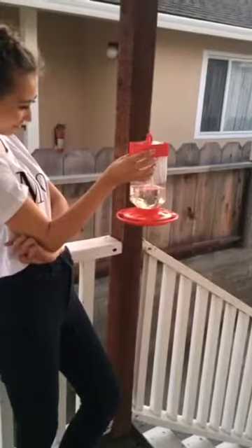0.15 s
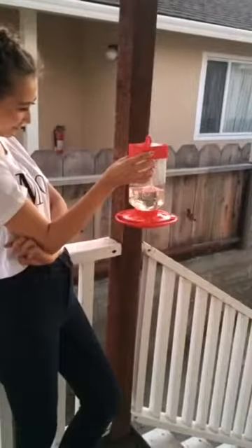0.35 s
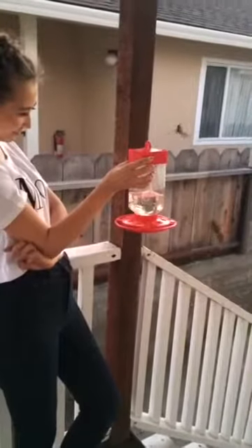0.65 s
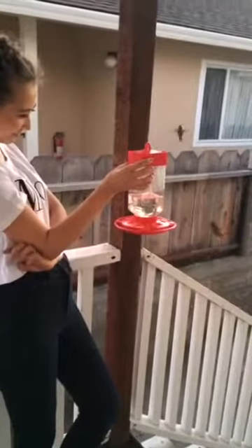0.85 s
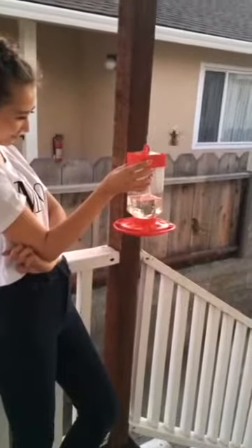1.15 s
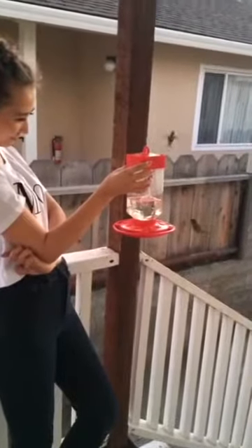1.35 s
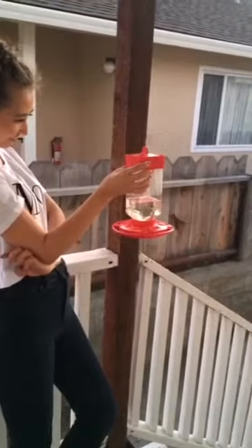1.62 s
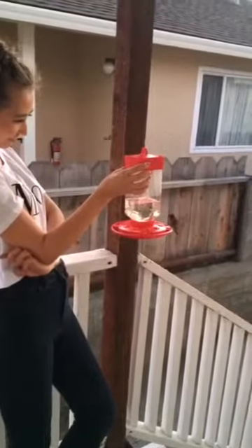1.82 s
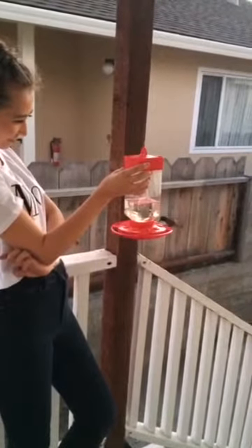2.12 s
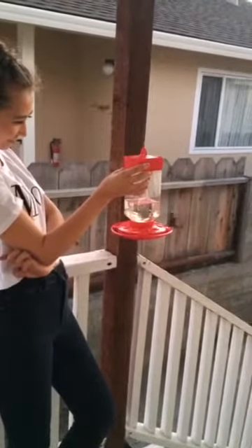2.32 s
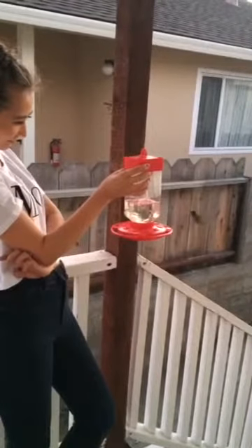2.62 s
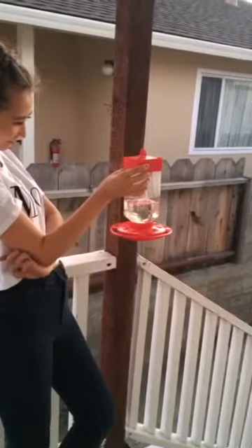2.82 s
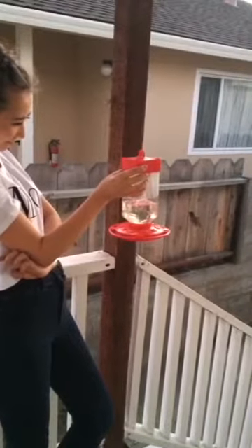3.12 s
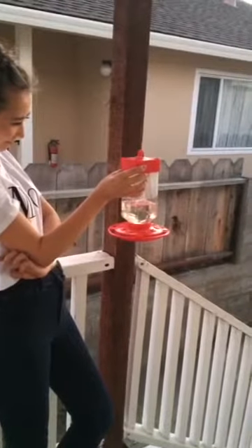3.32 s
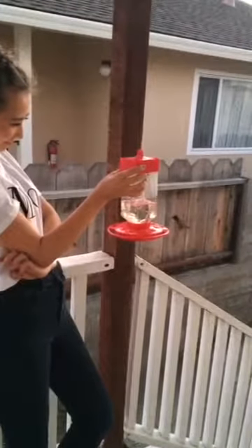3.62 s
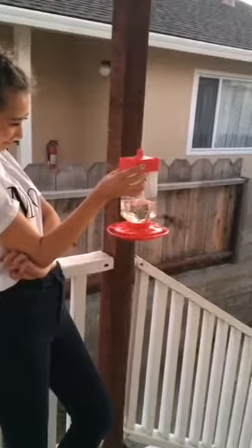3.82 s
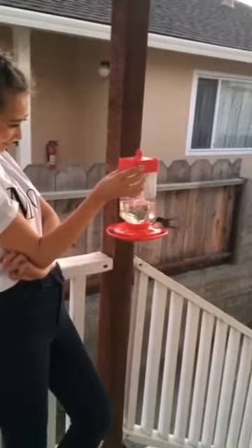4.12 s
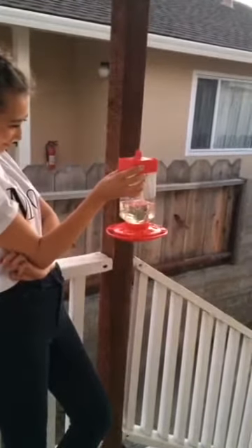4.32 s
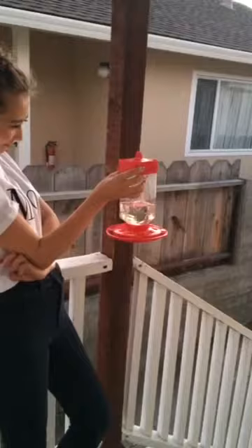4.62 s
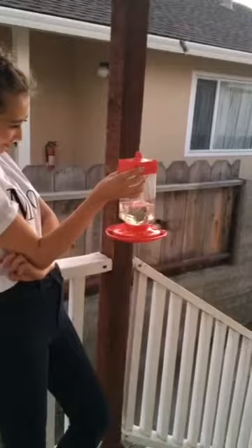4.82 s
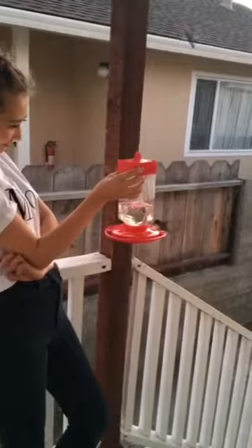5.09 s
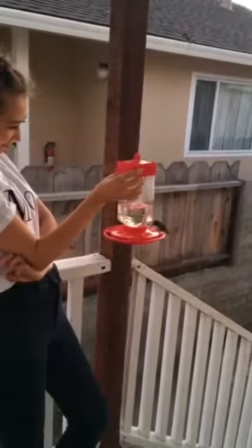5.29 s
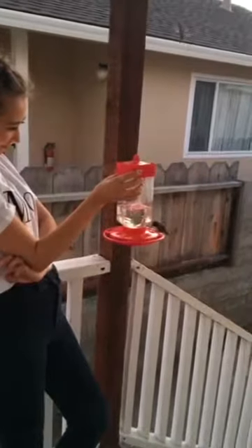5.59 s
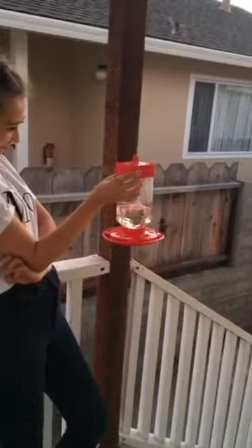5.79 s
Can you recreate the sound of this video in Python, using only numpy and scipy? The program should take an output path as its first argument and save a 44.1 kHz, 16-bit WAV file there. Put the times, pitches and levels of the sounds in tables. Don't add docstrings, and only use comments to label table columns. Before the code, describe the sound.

Piercing short bird chips scatter across a quiet porch, with soft fluttering wing buzz, light feeder taps, distant traffic rumble and thin airy hiss.

```python
import sys
import numpy as np
from scipy import signal
from scipy.fft import rfft, irfft, next_fast_len
from scipy.io import wavfile
from scipy.ndimage import uniform_filter1d, minimum_filter1d, map_coordinates

SR = 44100
rng = np.random.default_rng(int(sys.argv[2]) if len(sys.argv) > 2 else 0)


def digitize_waveform(pressure):
    field = np.atleast_2d(pressure).T
    bounded = np.clip(field, -1, 1)
    quanta = np.round(bounded * 32767).astype(np.int16)
    wavfile.write(sys.argv[1], SR, quanta)


def field_ratio(decibels):
    return 10 ** (np.asarray(decibels, dtype=float) / 20)


N = 262395

# (frequency [Hz], density [dB per Hz])
RUMBLE_SPECTRUM = [(12, -54), (20, -25.5), (102, 2), (177, -3), (209, -7.5), (264, -19), (330, -20.5),
                   (430, -37.5), (730, -120)]
DRONE_SPECTRUM = [(130, -43.5), (220, 0.5), (269, -13.5), (356, -4.5), (504, -9), (592, -9.5), (753, -11),
                  (947, -11.5), (1120, -17), (1370, -16), (1610, -25), (1830, -24.5), (2400, -29),
                  (3120, -88), (5280, -120)]
HISS_SPECTRUM = [(1060, -32.5), (1800, -5), (2000, -12.5), (2360, -10), (2680, -9), (4020, -11),
                 (5030, -13.5), (6490, -12.5), (6940, -15), (10800, -14.5), (14100, -39), (22000, -120)]
# (time [s], level [dB])
TRAFFIC_LEVEL = [(0, -44.5), (.13, -45.5), (.24, -55.5), (.4, -48.5), (.68, -45), (.9, -47.5), (2.4, -47.5),
                 (3.2, -48.5), (3.33, -44.5), (3.45, -47), (4.15, -49), (4.57, -46.5), (4.8, -47.5),
                 (5.3, -49.5), (5.7, -52), (5.88, -44.5), (5.95, -48.5)]
# (time [s], strength [dB])
BREEZE_STRENGTH = [(0, 2), (.3, -2.5), (.6, 1.5), (.89, -1.5), (1.14, 1), (1.3, -1), (1.87, -4),
                   (2.48, 2.5), (2.7, -1.5), (3.2, -2.5), (3.33, 1.5), (3.45, -1.5), (4.7, -3), (5.1, -4),
                   (5.75, -6), (5.88, 1.5), (5.95, -15)]
# (frequency [Hz], level [dB])
MACHINE_TONE = (594, -77)
# (frequency [Hz], 60 dB decay time [s])
YARD_DECAY = [(2000, 0.18), (5000, 0.16), (9300, 0.22)]
# (frequency [Hz], level [dB])
WING_OVERTONES = [(45, -7.5), (100, 3.5), (220, -0.5), (320, -13), (460, -9), (600, -26.5), (1000, -40.5)]
# (time [s], level [dB])
HOVER_LEVEL = [
    (0, -68.5),
    (1.2, -59.5),
    (2.0, -61),
    (4.4, -65.5),
    (5.1, -68.5),
    (5.95, -71),
]
# (time [s], half length [s], beat rate [Hz], peak level [dB])
WING_DARTS = [(0.129, 0.044, 47, -49), (0.274, .07, 48, -54), (0.628, 0.039, 41.3, -50),
              (0.766, 0.062, 48, -46.5), (.99, 0.075, 51.7, -51.5), (1.597, 0.068, 49, -54),
              (2.272, 0.067, 54.8, -46.5), (2.553, 0.097, 46.6, -53), (3.054, 0.053, 51.5, -55),
              (3.436, 0.096, 48.4, -54), (3.68, .1, 55, -57), (4.091, 0.056, 49.2, -54.5),
              (4.598, .13, 49, -54.5), (4.995, 0.037, 69, -56.5), (5.588, 0.057, 46.4, -56.5),
              (5.858, 0.037, 49, -53.5)]
# (time [s], peak level [dB],
# ring frequency [Hz])
FEEDER_TICKS = [(.3822, -54, 5500), (.531, -56, 3000), (1.5995, -58, 5000), (1.6045, -50, 2600),
                (1.611, -54, 2600), (2.416, -58, 3400), (2.9357, -46.5, 2440), (3.2174, -62, 6000),
                (3.2965, -57, 3000), (3.4274, -56, 3060), (3.8053, -57, 2600), (4.3655, -61, 2400),
                (4.6875, -56, 2500), (5.7314, -59, 1800), (5.7544, -63, 6500)]
# (time of mid-dive [s], length of the arch before it [s], top pitch [Hz])
NEAR_CHIPS = [(0.399, .0166, 9400), (0.5435, .0158, 9400), (0.6257, .0138, 9500), (0.9447, .0152, 9400),
              (1.1012, .0146, 9400), (1.179, .0136, 9200), (1.5267, .0161, 9400), (1.619, .0146, 9400),
              (2.0042, .0139, 8900), (2.433, .0159, 9400), (2.5647, .0163, 9300), (2.9045, .0153, 9300),
              (3.2337, .0143, 9400), (3.319, .0143, 9200), (3.8338, .0164, 9300), (4.3872, .0161, 9600),
              (4.708, .014, 9400), (5.8557, .0162, 9300)]
# (peak level [dB], dive over arch as the beak turns away [dB])
CHIP_AIMS = [(-37.5, -4), (-40, 1), (-34, -1.5), (-37.5, 1), (-41.5, 7), (-32, 0), (-39.5, 2), (-39.5, 1.5),
             (-36.5, -10.5), (-42, 6), (-39, 0.5), (-37.5, -0.5), (-38, 0.5), (-40, 1), (-42.5, 3),
             (-37.5, 3), (-36.5, -1.5), (-38, 1.5)]
# (time of mid-dive [s], top pitch [Hz], slowness [ratio], peak level [dB],
# dive level [dB], octave level [dB])
DISTANT_CHIPS = [
    (4.1306, 8630, 0.38, -58, -2, -33),
    (5.275, 9030, 0.63, -75, -14, -30),
]
# (time from mid-dive [ms], level [dB])
CHIP_SWELL = [(-18, -3), (-10, 0), (-7, 0), (-4, -2.5), (-2, -1), (0, 0), (2.2, -7.5), (3.1, -19),
              (4.2, -48)]

DRONE_DB, HISS_DB = -64.5, -73
DRONE_FOLLOWS = 0.22
HOVER_BEATS_HZ = 49
WALL_S, WALL_DB, SCATTER_DB = .0045, -9, -28.5
ECHO_PER_TURN = 0.24
USUAL_DB, OCTAVE_DB, OCTAVE_GROWS = -39, -26, 4.5
USUAL_ARCH_S, USUAL_SLOW, SLOW_POWER = .015, .86, .4
RISE_S = .0019
CREST_MS = 12
CLIMB, BOTTOM = .16, .22
FALL, FALL_POWER = .404, 2.9
GATE_EDGE_HZ, GATE_DEPTH_DB = 9800, 29
GATE_SLOPE_DB, GATE_WAVER_DB = 16, 11


def unit(x):
    return x / np.sqrt(np.mean(x ** 2) + 1e-20)


def along(points, hz):
    f, v = np.transpose(points)
    return np.interp(np.log(hz + 1), np.log(f + 1), v)


def curves(rows):
    s, *cols = np.transpose(rows)
    return [np.interp(np.arange(N) / SR, s, c) for c in cols]


def wobble(rate):
    knots = rng.standard_normal(int(N * rate / SR) + 4)
    return map_coordinates(knots, [np.arange(N) * rate / SR])


def smooth_field(shape, bins, frames):
    across = uniform_filter1d(rng.standard_normal(shape), size=bins, axis=0)
    return uniform_filter1d(across, size=frames, axis=1)


def rush(spectrum, patchy_db):
    _, _, z = signal.stft(rng.standard_normal(N + 2048), SR, nperseg=512)
    patches = unit(smooth_field(z.shape, 8, 8))
    x = signal.istft(z * field_ratio(patchy_db * patches), SR, nperseg=512)[1]
    m = next_fast_len(len(x))
    colour = field_ratio(along(spectrum, np.fft.rfftfreq(m, 1 / SR)))
    return unit(irfft(rfft(x, m) * colour, m)[:N])


def outdoors():
    breeze = curves(BREEZE_STRENGTH)[0]
    rumble_db = curves(TRAFFIC_LEVEL)[0] - 3.5 + 0.75 * wobble(7)
    drone_db = DRONE_DB + DRONE_FOLLOWS * breeze + 2.5 + 1.1 * wobble(5.31)
    hiss_db = HISS_DB + breeze + .4 + .6 * wobble(8)
    rumble = field_ratio(rumble_db) * rush(RUMBLE_SPECTRUM, patchy_db=0.33)
    drone = field_ratio(drone_db) * rush(DRONE_SPECTRUM, patchy_db=1.64)
    hiss = field_ratio(hiss_db) * rush(HISS_SPECTRUM, patchy_db=1.5)
    tone_hz, tone_db = MACHINE_TONE
    turns = np.cumsum(tone_hz + 3 * wobble(4)) / SR
    machine = field_ratio(tone_db + 3 * wobble(3)) * np.sin(2 * np.pi * turns)
    return rumble + drone + machine + hiss


def bump(t, at, wide):
    return np.exp(-((t - at) / wide) ** 2)


def porch(delay, wall_db, scatter_db):
    _, t, z = signal.stft(hz_noise := rng.standard_normal(SR // 3), SR, nperseg=128)
    hz = np.fft.rfftfreq(128, 1 / SR)
    patches = 3 * unit(smooth_field(z.shape, 4, 3))
    decay_db = -60 * t / along(YARD_DECAY, hz)[:, None]
    yard = signal.istft(z * field_ratio(patches + decay_db), SR, nperseg=128)[1]
    t = np.arange(len(yard)) / SR
    yard *= 1 - np.exp(-(t / .003) ** 2)
    near, wall = bump(t, .0015, .001), bump(t, delay + .0008, .0014)
    posts, fence = bump(t, .0115, .003), bump(t, .033, .011)
    rough = rng.standard_normal(len(t))
    response = field_ratio(scatter_db - 5) * yard * (1 + 0.38 * fence)
    response += rough * (field_ratio(wall_db - 17.5) * wall + field_ratio(scatter_db - 3.5) * posts)
    response += rough * field_ratio(-26) * near
    response[round(delay * SR)] += field_ratio(wall_db - 4)
    response[1:] -= 0.09 * response[:-1]
    response[2:] += 0.42 * response[:-2]
    response[rng.integers(20, 60)] += field_ratio(-10)
    response[0] = 1
    return response


def add(track, s, sound):
    part = track[round(s * SR):][:len(sound)]
    part += sound[:len(part)]


def flock():
    t, hover = np.arange(N) / SR, field_ratio(curves(HOVER_LEVEL)[0])
    beats, gain = HOVER_BEATS_HZ * hover, hover
    for s, half, beat_hz, db in WING_DARTS:
        near = field_ratio(db) * bump(t, s, half)
        beats = beats + beat_hz * near
        gain = gain + near
    return beats / gain, gain


def wings():
    rate, gain = flock()
    turns = np.cumsum(rate * (1 + 0.01202 * wobble(14))) / SR
    hum = np.zeros(N)
    for k in range(1, 16):
        strength = field_ratio(along(WING_OVERTONES, k * rate) + 6.0 * wobble(9))
        hum += strength * np.sin(2 * np.pi * (k * turns + rng.random()))
    return field_ratio(-3.5) * gain * unit(hum)


def feeder():
    out, t = np.zeros(N), np.arange(SR // 40) / SR
    for s, db, hz in FEEDER_TICKS:
        modes = .4 * np.sin(2 * np.pi * hz * t) + .3 * np.sin(np.pi * hz * t)
        ring = modes * field_ratio(-60 * t / .014)
        crack = uniform_filter1d(rng.standard_normal(len(t)), size=3) * field_ratio(-60 * t / .012)
        add(out, s, field_ratio(db) * signal.fftconvolve(ring + crack, porch(.004, -9, -30)))
    return out


def glide(ms):
    after = ms + CREST_MS
    climb = CLIMB * (np.minimum(after, 0) / 10) ** 2
    fall = FALL * (np.maximum(after, 0) / CREST_MS) ** FALL_POWER
    return np.maximum(1 - climb - fall, BOTTOM)


def whistle(top_hz, slow, db, dive_db, octave_db, lead, rise):
    t = np.arange(-.03, .006, 1 / SR)
    ms = t * 1000 / slow
    pitch = top_hz * uniform_filter1d(glide(ms), size=60)
    level_db = np.interp(ms, *np.transpose(CHIP_SWELL)) + dive_db * np.clip((ms + 5) / 4, 0, 1)
    level_db += map_coordinates(rng.standard_normal(20), [(t + .03) * 500])
    start = 1 / (1 + np.exp(-(t + lead - .5 * rise) / (.33 * rise)))
    start *= np.clip((t + lead + .0012) / .0008, 0, 1)
    phase = 2 * np.pi * np.cumsum(pitch) / SR
    octave = field_ratio(min(octave_db, -11) - 5 * np.clip(ms, 0, 9))
    tone = np.sin(phase) + octave * np.sin(2 * phase)
    return field_ratio(db + uniform_filter1d(level_db, size=30)) * start * tone


def birds():
    out = np.zeros(N)
    for (s, arch, top_hz), (db, turn_db) in zip(NEAR_CHIPS, CHIP_AIMS):
        chance = rng.standard_normal(3)
        slow = USUAL_SLOW * (arch / USUAL_ARCH_S) ** SLOW_POWER
        rise = RISE_S * field_ratio(1.5 * chance[0])
        octave_db = OCTAVE_DB + OCTAVE_GROWS * (db - USUAL_DB)
        chip = whistle(top_hz, slow, db, turn_db, octave_db, arch, rise)
        echo_db = ECHO_PER_TURN * turn_db
        wall_db = WALL_DB + echo_db + 2 * chance[2]
        answer = porch(WALL_S + .0002 * chance[1], wall_db, SCATTER_DB + echo_db)
        add(out, s - .03, signal.fftconvolve(chip, answer))
    for s, *voice in DISTANT_CHIPS:
        chip = whistle(*voice, lead=.005, rise=.002)
        add(out, s - .03, signal.fftconvolve(chip, porch(.003, wall_db=0, scatter_db=-18)))
    return out


def scene():
    return (outdoors() + wings() + feeder() + birds())[None]


def gated_top(x):
    hz, _, z = signal.stft(x, SR, nperseg=1024)
    level = uniform_filter1d(abs(z) ** 2, size=5, axis=1)
    chip_power = level[:, (hz > 7000) & (hz < GATE_EDGE_HZ)].max(1)
    loud = -minimum_filter1d(-chip_power, size=4, axis=1)
    bands = rng.standard_normal((len(hz) // 8 + 1, z.shape[2] // 2 + 1))
    bands = bands.repeat(8, axis=0).repeat(2, axis=1)
    waver_db = GATE_WAVER_DB * bands[:len(hz), :z.shape[2]]
    slope_db = GATE_SLOPE_DB * (hz[:, None] - GATE_EDGE_HZ) / 1000
    threshold = loud[:, None] * field_ratio(waver_db - 2 * GATE_DEPTH_DB + slope_db)
    keep = (hz[:, None] < GATE_EDGE_HZ) | (level > threshold)
    return signal.istft(z * keep, SR, nperseg=1024)[1][:, :N]


def top_cut(x):
    return signal.sosfilt(signal.butter(12, 10960, fs=SR, output="sos"), x)


def record(dry):
    m = next_fast_len(N + 4096)
    hz = np.fft.rfftfreq(m, 1 / SR)
    low_pass = [(10400, 2.5), (10800, -6.5), (11100, -21), (13000, -38), (16000, -60)]  # (Hz, dB)
    limited = irfft(rfft(dry, m) * field_ratio(along(low_pass, hz)), m)[:, :N]
    return top_cut(gated_top(limited))


dry = scene()
out = record(dry)
digitize_waveform(out)
```